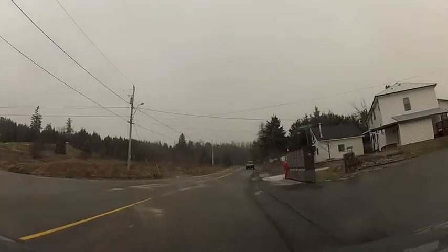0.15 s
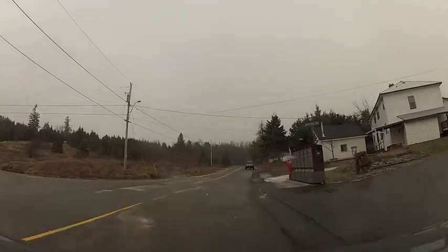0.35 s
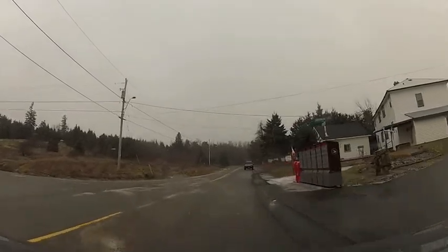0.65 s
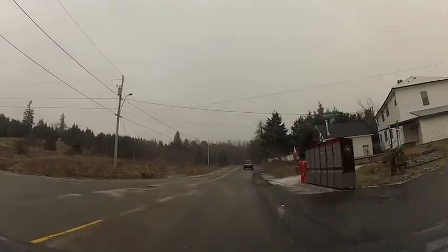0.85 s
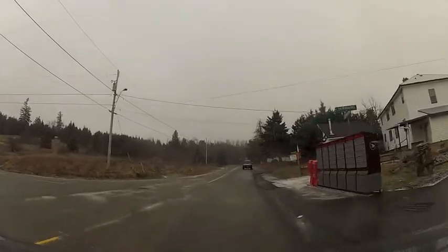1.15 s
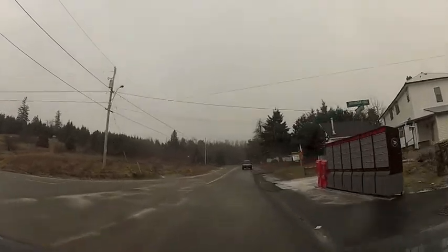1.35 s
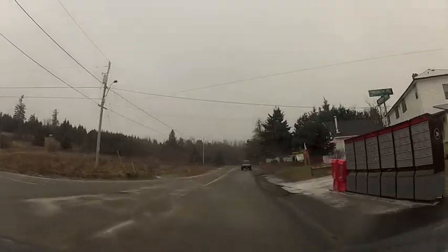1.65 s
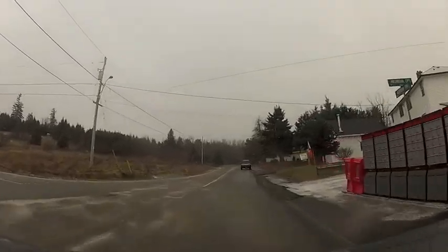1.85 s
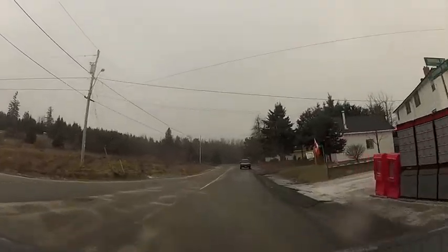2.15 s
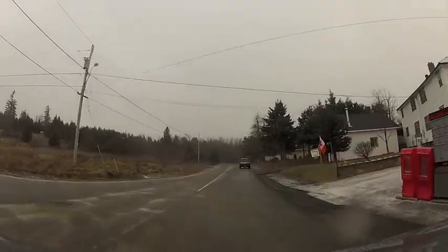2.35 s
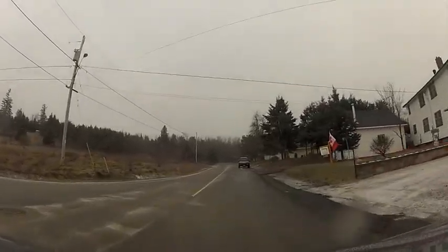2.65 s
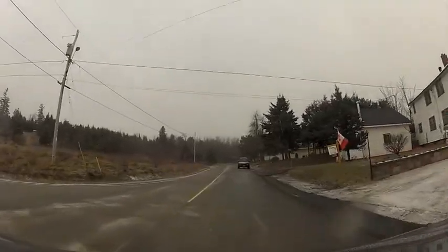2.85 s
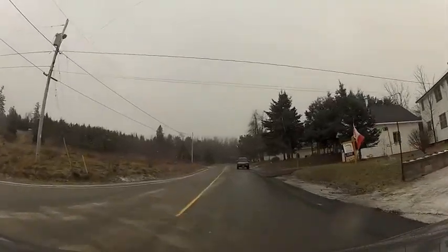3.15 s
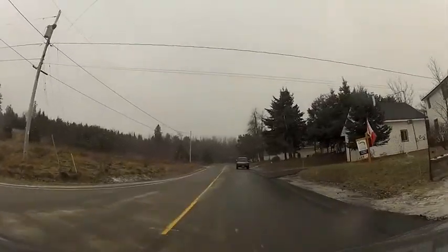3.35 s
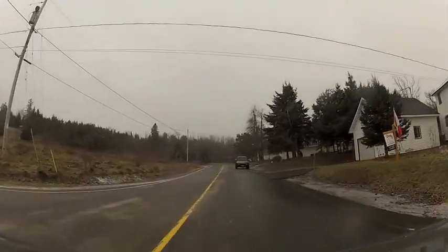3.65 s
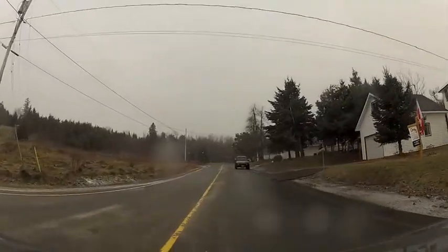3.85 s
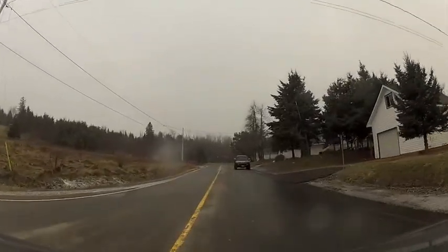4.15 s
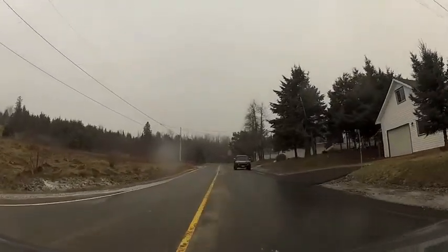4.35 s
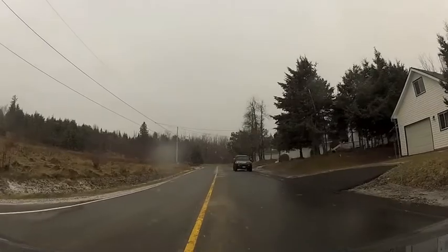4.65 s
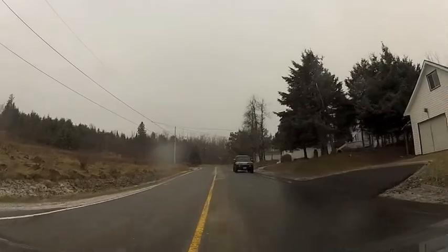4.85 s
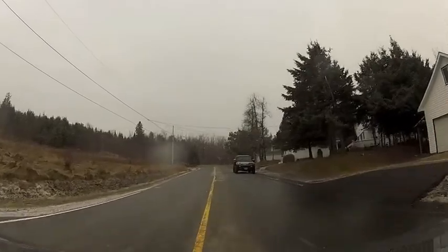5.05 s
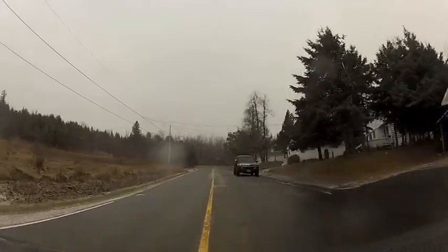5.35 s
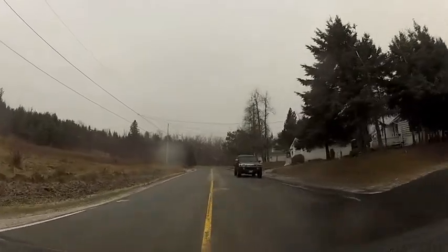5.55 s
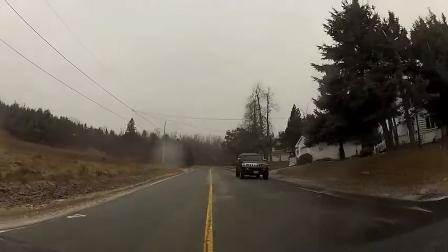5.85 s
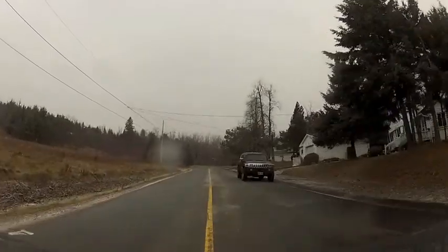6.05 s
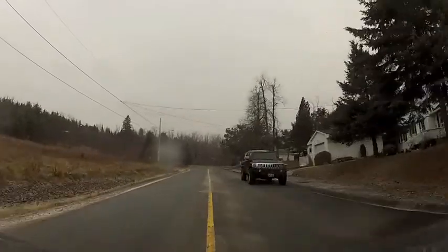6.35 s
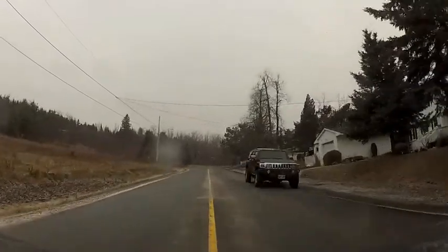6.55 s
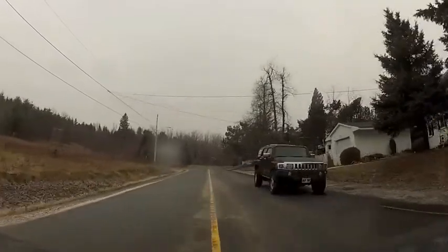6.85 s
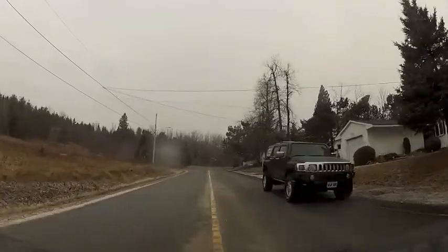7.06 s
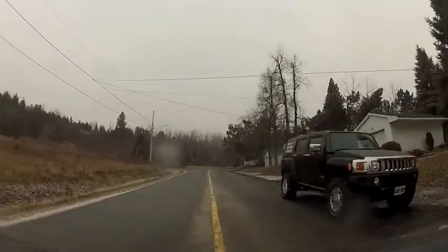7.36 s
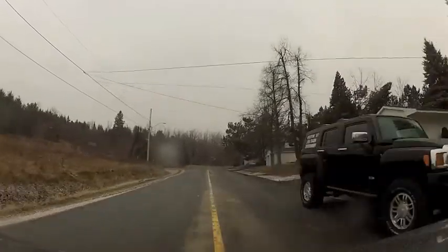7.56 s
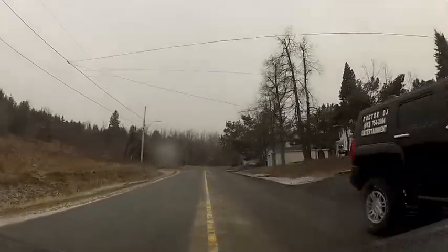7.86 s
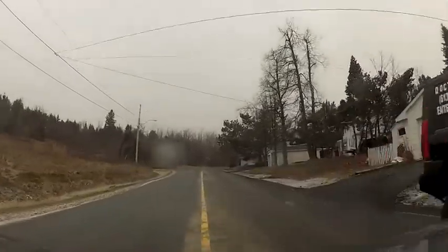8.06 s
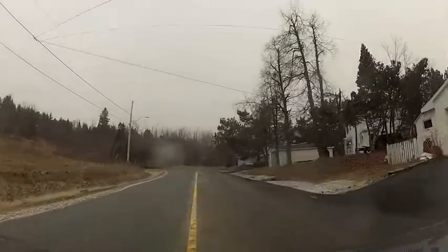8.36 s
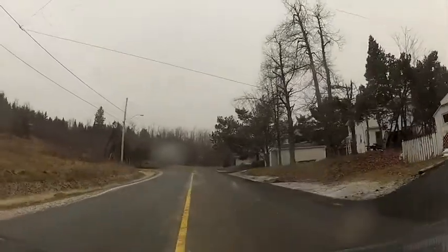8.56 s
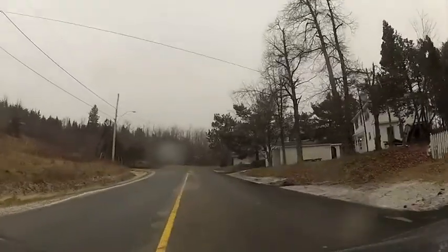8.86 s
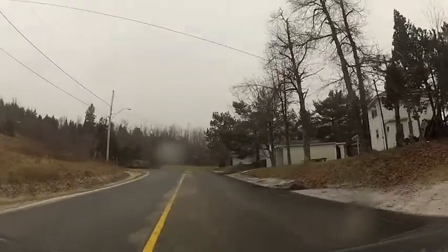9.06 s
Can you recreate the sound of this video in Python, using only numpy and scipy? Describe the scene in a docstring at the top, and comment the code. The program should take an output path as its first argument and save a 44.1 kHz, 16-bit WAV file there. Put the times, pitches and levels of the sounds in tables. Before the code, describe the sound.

A car engine throbs briefly at idle, then pulls away, shifts up with a jolt and climbs to a steady cruise. Its deep boom and light valve clatter mix with heavy road rumble and the hiss of tyres on wet pavement. The microphone sits outside on the hood, where drizzle ticks against its case, more often later on. A thin sizzle tops the sound.

```python
"""A four-cylinder car idles, pulls away, shifts up and cruises on a wet road, heard from its hood.
The engine booms through the body and its valves clatter. The road rumbles, the tyres hiss,
and drizzle ticks on the camera's case. The camera samples coarsely, which mirrors everything
into a thin sizzle in the treble."""
import sys
import numpy as np
from scipy import signal
from scipy.fft import rfft, irfft, next_fast_len
from scipy.io import wavfile
from scipy.ndimage import map_coordinates

SR = 44100
rng = np.random.default_rng(int(sys.argv[2]) if len(sys.argv) > 2 else 0)


def master_out(mix):
    """Clip the mix to full scale and print it as 16-bit PCM to the path in sys.argv[1]."""
    frames = np.transpose(np.atleast_2d(mix))
    ceiling = np.clip(frames, -1, 1)
    pcm = np.round(ceiling * 32767).astype(np.int16)
    wavfile.write(sys.argv[1], SR, pcm)


N = 406602


def amp(db):
    """Turn decibels into gain."""
    return 10 ** (np.asarray(db) / 20)


def curves(rows):
    """Join rows that start with a time into one curve for each other column."""
    s, *columns = np.transpose(rows)
    return [np.interp(np.arange(N) / SR, s, column) for column in columns]


def along(points, hz):
    """Read between (Hz, value) points on a log pitch axis."""
    pitches, values = np.transpose(points)
    return np.interp(np.log(hz + 1), np.log(pitches), values)


def bell(s, width):
    """A smooth swell of height 1 around time s."""
    return np.exp(-((np.arange(N) / SR - s) / width) ** 2)


def wobble(rate, step=64):
    """A smooth curve through `rate` random values a second."""
    coarse = np.arange(0, N + step, step)
    smooth = map_coordinates(rng.standard_normal(int(N * rate / SR) + 4), [coarse * rate / SR])
    return np.interp(np.arange(N), coarse, smooth)


def filtered(x, response):
    """Scale each frequency in x by response(hz)."""
    size = next_fast_len(N + SR // 2)
    return irfft(rfft(x, size) * response(np.fft.rfftfreq(size, 1 / SR)), size)[:N]


def coloured(x, spectrum, size=16384):
    """Shape x with (Hz, dB) points and scale it to rms 1."""
    cepstrum = irfft(np.log(amp(along(spectrum, np.fft.rfftfreq(size, 1 / SR)))))
    # folding this in half makes the filter ring only after each hit
    cepstrum[1:size // 2] *= 2
    cepstrum[size // 2 + 1:] = 0
    ring = irfft(np.exp(rfft(cepstrum)))
    shaped = signal.fftconvolve(x, ring)[:N]
    return shaped / np.sqrt(np.mean(shaped ** 2) + 1e-20)


def noise(spectrum):
    """Noise shaped by (Hz, dB) points, at rms 1."""
    return coloured(rng.standard_normal(N), spectrum)


# Idle, first gear, upshift, second gear, cruise. Each row: time in seconds, firings per second.
REVS = [(0, 27.8), (0.96, 27.8), (1.2, 37.9), (1.42, 42.6), (1.8, 51.3), (2.05, 54.1), (2.19, 50.6),
        (2.32, 40.4), (2.45, 36), (2.6, 38.6), (3, 41.6), (3.5, 46.7), (4.2, 52), (5, 55.8), (5.7, 56.7),
        (7, 55.3), (9.22, 55.5)]
def engine():
    """The cylinders fire in turn: give the firing rate and the count of firings so far."""
    firing_hz, = curves(REVS)
    return firing_hz, np.cumsum(firing_hz) / SR


def overtones(firing_hz, firings, multiples, spectrum, waver_db, drift):
    """Multiples of the firing rate, near rms 1; each swells as it glides through a resonance."""
    tone, power = np.zeros(N), np.zeros(N)
    for k in multiples:
        gain = amp(along(spectrum, k * firing_hz))
        sway = wobble(7)
        phase = 2 * np.pi * (k * firings + rng.random()) + drift * sway[::-1]
        tone += gain * amp(waver_db * sway) * np.sin(phase)
        power += gain ** 2
    return tone * np.sqrt(2 / power)


# How the car's body resonates. Each row: firings per second, then boom, octave and drone in dB.
BODY_LEVELS = [(27.8, -41, -36, -43.5), (33.4, -46, -38, -41.5), (36, -31, -27, -37), (38.6, -30, -23, -37),
               (39.8, -22, -23, -35.5), (42, -22, -23.5, -34), (48.2, -21, -26, -37), (51, -18, -39, -32),
               (54, -17.3, -38, -29), (55.4, -15.7, -34.5, -33), (56.6, -15.6, -39, -36.8)]
def body(firing_hz):
    """Boom, octave and drone in dB: they swell and fade as the revs pass the body's resonances."""
    rates, *levels = np.transpose(BODY_LEVELS)
    return [np.interp(firing_hz, rates, level) for level in levels]


# How the body panels pass the engine's overtones. Each row: pitch in Hz, relative level in dB.
PANEL_TONE = [(80, -12), (120, -2), (138, -4), (163, 0), (185, -10), (210, -2), (225, -9), (260, -8),
              (280, -14), (300, -18), (322, -12), (335, -20), (400, -25)]
def hum(firing_hz, firings, uneven_db=-15, lurch_db=6, lurch_s=0.058):
    """A deep boom that lurches at each shift, its octave, and the drone of the panels."""
    boom_db, octave_db, drone_db = body(firing_hz)
    lurch = lurch_db * sum(bell(s, lurch_s) for s, _, _ in JOLTS)
    phase = 2 * np.pi * firings
    boom = amp(boom_db + lurch + .75 * wobble(9)) * np.sin(phase)
    octave = amp(octave_db) * np.sin(2 * phase)
    drone = amp(-1) * overtones(firing_hz, firings, np.arange(3, 8), PANEL_TONE, waver_db=1.3, drift=.1)
    # unequal cylinders add tones halfway between the overtones
    uneven = overtones(firing_hz, firings, np.arange(3, 6) + .5, PANEL_TONE, waver_db=2, drift=.3)
    return np.sqrt(2) * (boom + octave) + amp(drone_db) * (drone + amp(uneven_db) * uneven)


# The shaking at idle, gone as the car pulls away. Each row: time in seconds, level in dB.
IDLE_LEVEL = [(0, -30), (.5, -33), (.9, -31), (1.05, -32), (1.25, -45), (1.6, -80)]
def idle(firings, fan_hz=75.4, whine_hz=918, throb_db=-1, whine_db=-18, air_db=-21):
    """The engine throbs against the cooling fan, the fan's air rushes and an accessory whines."""
    level_db, = curves(IDLE_LEVEL)
    t = np.arange(N) / SR
    fan = np.sin(2 * np.pi * fan_hz * t + .4 * wobble(6))
    shake = np.sin(2 * np.pi * 3 * firings)  # close to the fan's pitch, so the two beat
    pulsing = 1 + np.cos(2 * np.pi * firings)
    whine = np.sin(2 * np.pi * whine_hz * t + wobble(9.1)) * pulsing
    tones = np.sqrt(2) * (amp(throb_db) * (fan + shake) + amp(whine_db) * whine)
    air = noise([(180, -10), (290, 5), (440, -4), (700, -18), (1500, -38)])
    return amp(level_db) * (tones + amp(air_db) * air)


def growl(firing_hz, growl_db=-6, easing_db=-10):
    """Uneven combustion shakes the panels as the engine labours at low revs, and eases as it speeds up."""
    _, _, drone_db = body(firing_hz)
    pulling = np.clip((firing_hz - 24) / 10, 0, 1)
    easing = np.clip((firing_hz - 42) / 12, 0, 1)
    shaking = noise([(100, -33.5), (150, -6), (185, -10), (215, 13),
                     (255, 2.5), (295, -6.5), (350, -12.5), (500, -36)])
    return pulling * amp(drone_db + growl_db + easing_db * easing) * shaking


# The accelerator is pressed, held, then eased. Each row: time in seconds, throttle from 0 to 1.
PEDAL = [(0.97, 0), (1.4, 0.82), (5.6, 0.9), (6.2, 0.5)]
def effort(firing_hz, base_db=-38.5, idle_hz=27.8, db_per_doubling=3.5, throttle_db=4.5):
    """The engine bay's level in dB, which rises with the revs and the throttle."""
    throttle, = curves(PEDAL)
    return base_db + db_per_doubling * np.log2(firing_hz / idle_hz) + throttle_db * throttle


# How the engine bay colours the clatter. Each row: pitch in Hz, relative level in dB.
BAY_TONE = [(200, -13), (300, -22), (360, -21), (460, -6), (505, 1.5), (550, 0.5), (590, -1), (675, 0),
            (705, -3), (755, 1.5), (830, -4.5), (905, -0.5), (1000, -10), (1150, -18.5), (1600, -44)]
def clatter(firing_hz, firings, gain_db=-4.7, throb=0.039, taps_per_firing=16, cylinders=4, slip_s=5e-5):
    """Valve taps repeat with every turn of the cam, over a rasp that pulses with the firings."""
    count = cylinders * taps_per_firing
    places = (np.arange(count) + rng.random(count)) / taps_per_firing  # in firings
    sizes = rng.choice([-1, 1], count) * amp(2 * rng.standard_normal(count))
    turns = np.arange(int(firings[-1] / cylinders) + 1)[:, None]
    # each tap's timing and force vary a little from turn to turn
    slip, force_db = rng.standard_normal((len(turns), 2, count)).transpose(1, 0, 2)
    at = np.interp(cylinders * turns + places, firings, np.arange(N), right=2 * N)
    at = np.abs(at + slip_s * SR * slip).astype(int)
    taps = np.bincount(at.ravel(), (sizes * amp(force_db)).ravel(), N)[:N]
    pulsing = 1 + throb * (np.cos(2 * np.pi * firings) + np.cos(np.pi * firings)) / 2
    rasp = coloured(rng.standard_normal(N) * pulsing, BAY_TONE)
    return amp(effort(firing_hz) + gain_db) * (coloured(taps * pulsing, BAY_TONE) + rasp)


# How fast the car rolls. Each row: time in seconds, share of the cruising speed.
ROAD_SPEED = [(0, .38), (.85, .36), (2, .8), (2.5, .7), (4.2, 1.05), (5.2, 1.05), (6, .88), (7, 1)]
def pace():
    """Road speed in doublings: 0 at the cruise, -1 at half that speed."""
    speed, = curves(ROAD_SPEED)
    return np.log2(speed)


# The colour of the road's rumble. Each row: pitch in Hz, relative level in dB.
RUMBLE_TONE = [(10, -39), (18, -24), (27, -14), (42, -5.5), (60, -11.5), (74, 4), (85, 0.5), (100, -11),
               (125, -18.5), (155, -14.5), (190, -27), (240, -29), (340, -42), (600, -54.5)]
# Rough stretches of road. Each row: middle in seconds, rise in dB, half-width in seconds.
ROUGH_ROAD = [(6.1, 5.5, 0.32), (8.803, 0.5, .25)]
def rumble(cruise_db=-27.5, db_per_doubling=2.5, lumps_db=0.7):
    """The uneven road shakes the hood, harder with speed."""
    rough_db = sum(db * bell(s, width) for s, db, width in ROUGH_ROAD)
    level_db = cruise_db + db_per_doubling * pace() + rough_db - lumps_db * wobble(5.3)
    return amp(level_db) * noise(RUMBLE_TONE)


# The colour of the wet tyres. Each row: pitch in Hz, relative level in dB.
TYRE_TONE = [(300, -4), (700, 1.5), (1080, 1.5), (1220, 3), (1300, 8.5), (1450, 3.5), (1580, -1.5),
             (1900, 2.5), (2300, -8), (2700, -10.5), (3100, -18), (3500, -6.5), (4000, -25)]
def tyres(base_db=-42.5, db_per_doubling=6.5, spray_hz=2000, spray_db=-1.5):
    """The tyres hiss through a film of water, louder and brighter with speed."""
    doublings = pace()
    hiss = noise(TYRE_TONE)
    roar = filtered(hiss, lambda hz: 1 / (1 + (hz / spray_hz) ** 6))
    spray = amp(spray_db + doublings) * (hiss - roar)  # 1 dB brighter per doubling
    return amp(base_db + db_per_doubling * doublings + wobble(25)) * (roar + spray)


# How the case rings. Each row: multiple of the drop's pitch, level in dB, seconds to fade by 60 dB.
CASE_RINGS = [(.9, -1, 0.0043), (1.067, -4.5, 0.013), (1.28, -4.5, 0.0054), (1.7, -9, 0.0098)]
def drop(pitch_hz, splash_db=-19, splash_s=.022, attack_s=0.00023):
    """One drop briefly rings the case and makes a little splash, scaled to peak 1."""
    t = np.arange(SR // 40) / SR
    ring = sum(amp(db + rng.normal(0, 1.6) - 60 * t / fade_s) * np.sin(2 * np.pi * ratio * pitch_hz * t)
               for ratio, db, fade_s in CASE_RINGS)
    splash = rng.standard_normal(len(t)) * amp(splash_db - 60 * t / splash_s)
    tick = (ring + splash) * (1 - np.exp(-t / attack_s))
    return tick / np.abs(tick).max()


# Big raindrops on the case. Each row: start in seconds, relative level in dB, pitch in Hz.
BIG_DROPS = [(0.0712, -43.5, 1980), (0.312, -35, 2220), (0.4304, -32.5, 2400), (0.7595, -32, 2580),
             (0.9545, -28, 2340), (1.3194, -31.5, 1780), (1.4691, -36, 2330), (1.8965, -29, 2620),
             (2.9098, -29, 1990), (3.1702, -27, 2000), (3.8733, -25, 1830), (4.2213, -27, 2600),
             (4.4896, -31, 1900), (4.7185, -17.5, 1900), (4.9792, -26.5, 2020), (5.1198, -29.5, 1930),
             (5.559, -25, 1870), (5.9288, -24.5, 2000), (6.0187, -25, 2020), (6.1275, -28, 2040),
             (6.1744, -28, 2080), (6.5121, -28.5, 2050), (6.604, -31, 2100), (7.0932, -24, 2390),
             (7.1037, -20.5, 1900), (7.7208, -26.5, 2120), (7.8002, -28, 3350), (7.9169, -26.5, 1750),
             (8.079, -21, 2020), (8.1539, -28.5, 1890), (8.2778, -26, 2210), (8.309, -23.5, 1740),
             (8.4043, -24, 1980), (8.4764, -29, 1940), (8.6443, -19.5, 2000), (8.746, -25.5, 1830),
             (8.8646, -22, 2020)]
# The drizzle thins, then thickens. Each row: time in seconds, relative number of fine drops.
RAIN_DENSITY = [(0, 1.4), (.7, .6), (2, .45), (3.5, .4), (4.2, 1), (6.2, 1.3), (9.22, 1.2)]
def drizzle(big_gain_db=4, fine_db=-35.5, db_per_doubling=4, fine_hz=2400, count=400):
    """Big drops, and a random patter of fine ones that hit harder as the car gathers speed."""
    density, = curves(RAIN_DENSITY)
    odds = density * amp(2 * wobble(14))
    at = np.searchsorted(np.cumsum(odds) / odds.sum(), rng.random(count)).clip(0, N - 1)
    size_db = np.minimum(5 * rng.standard_normal(count), 8)
    pitch_hz = fine_hz * np.exp(0.238 * rng.standard_normal(count))
    fine = np.transpose([at / SR, fine_db + db_per_doubling * pace()[at] + size_db, pitch_hz])
    big = [(s, db + big_gain_db, hz) for s, db, hz in BIG_DROPS]
    out = np.zeros(N + SR)
    for s, db, hz in big + list(fine):
        tick = amp(db) * drop(hz)
        out[round(s * SR):][:len(tick)] += tick
    return out[:N]


# The engine bay's resonances. Each row: pitch in Hz, relative level in dB.
BAY_RESONANCES = [(350, -17), (440, -6), (503, -1), (550, -2.5), (595, -10), (668, 1), (708, -6),
                  (755, 3.5), (825, -9), (898, -3), (1000, -15), (1150, -14), (1220, -27), (1295, -8.5),
                  (1450, -49)]
def sing(firing_hz, firings, gain_db=-3.5):
    """Above idle, the engine's high overtones sing in the bay's resonances."""
    fade_in = np.clip((firing_hz - 28) / 12, 0, 1)
    song = overtones(firing_hz, firings, np.arange(9, 25), BAY_RESONANCES, waver_db=2, drift=.32)
    return fade_in * amp(effort(firing_hz) + gain_db) * song


# The drive takes up, then shifts up. Each row: middle in seconds, level in dB, half-width in seconds.
JOLTS = [(1.062, -36.5, 0.073), (2.256, -28, 0.03)]
def shift_rattle():
    """Each jolt of the drive briefly rattles the engine bay."""
    swell = sum(amp(db) * bell(s, width) for s, db, width in JOLTS)
    return swell * noise([(450, -25), (650, 1), (760, 3.5), (900, 1),
                          (1080, -1.5), (1250, -19), (1800, -18), (3000, -46)])


def scene():
    """Engine, road and rain at one microphone."""
    firing_hz, firings = engine()
    motor = hum(firing_hz, firings) + sing(firing_hz, firings) + idle(firings)
    machinery = growl(firing_hz) + clatter(firing_hz, firings) + shift_rattle()
    return (motor + machinery + rumble() + tyres() + drizzle())[None]


# How the camera passes the treble. Each row: pitch in Hz, gain in dB.
CAMERA_TREBLE = [(5000, 0), (8000, 0.5), (10500, 1), (13800, -0.5), (14800, -5.5), (15400, -9.5)]
def record(dry, edge_hz=3620, hold_hz=8000, top_hz=15600):
    """The camera samples slowly and holds each value, mirroring the sound around multiples of its rate."""
    narrow = filtered(dry[0], lambda hz: 1 / np.sqrt(1 + (hz / edge_hz) ** 40))
    clock = 2 * np.pi * hold_hz * np.arange(N) / SR
    mirrored = narrow * (1 + 2 * np.cos(clock) + 2 * np.cos(2 * clock))
    held = filtered(mirrored,
                    lambda hz: np.sinc(hz / hold_hz) * amp(along(CAMERA_TREBLE, hz)) * (hz < top_hz))
    return held[None]


dry = scene()
out = record(dry)
master_out(out)
```